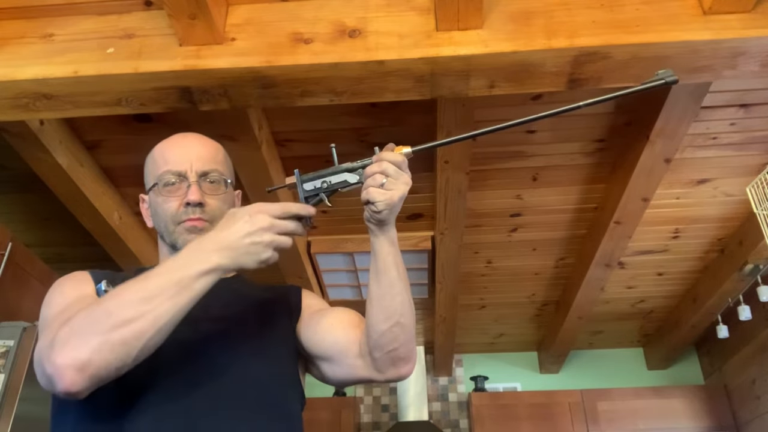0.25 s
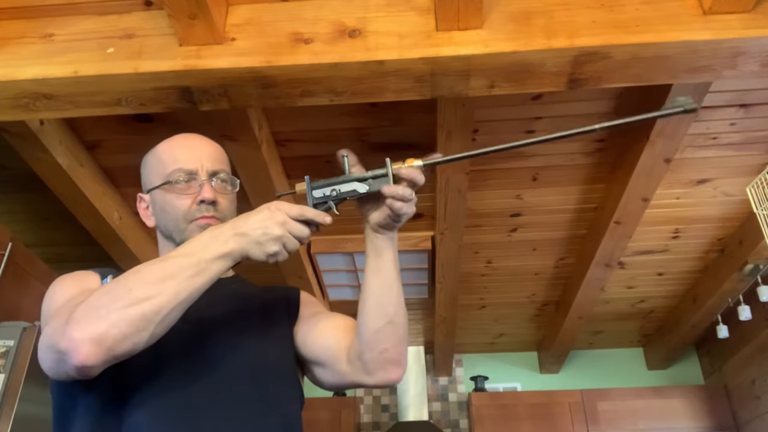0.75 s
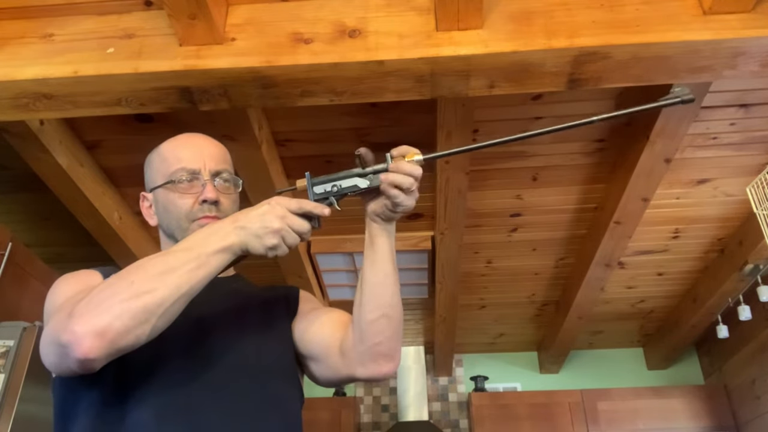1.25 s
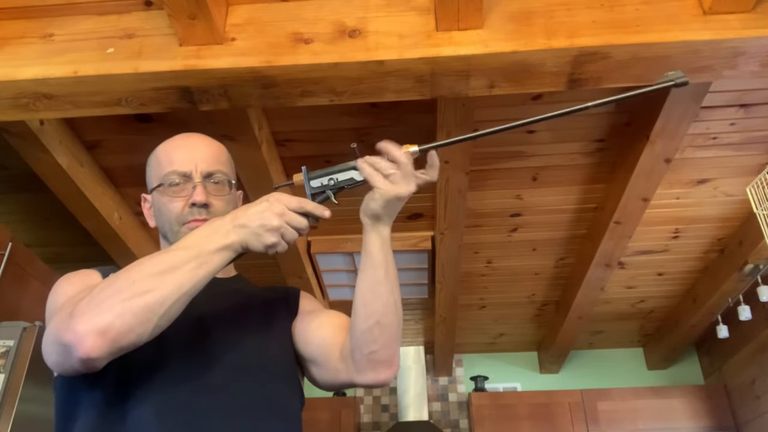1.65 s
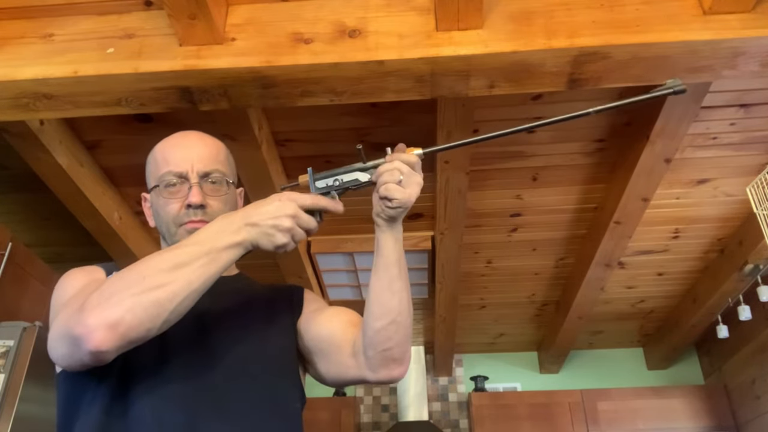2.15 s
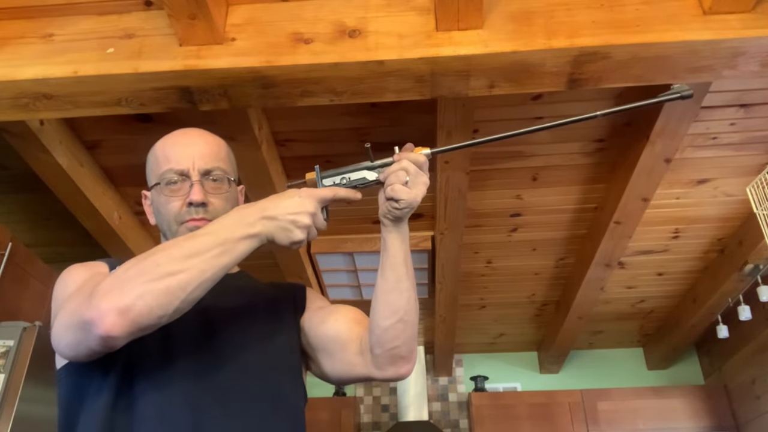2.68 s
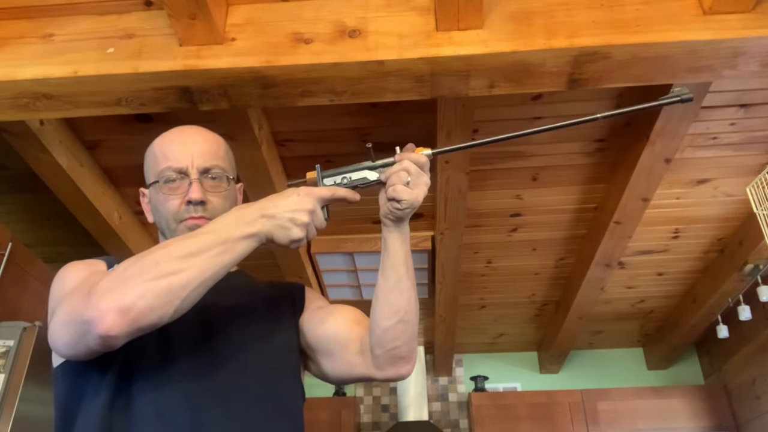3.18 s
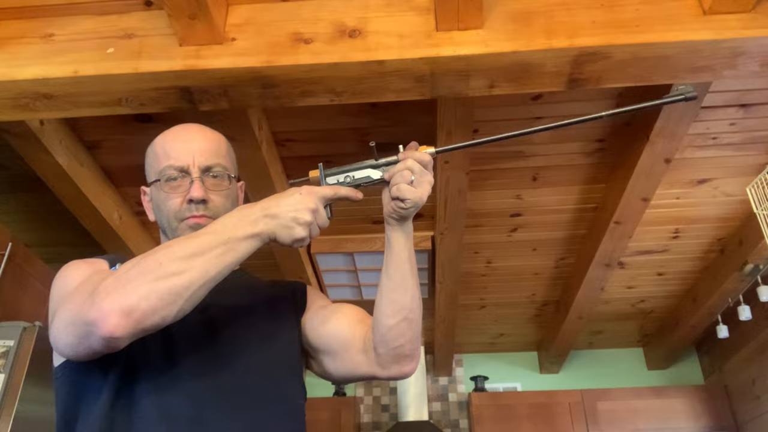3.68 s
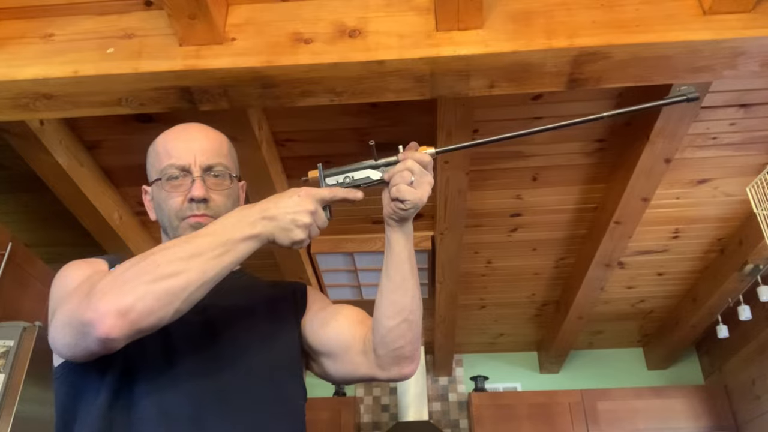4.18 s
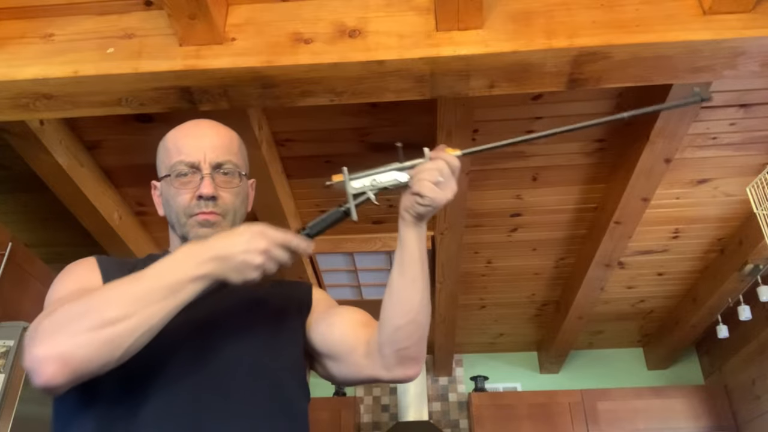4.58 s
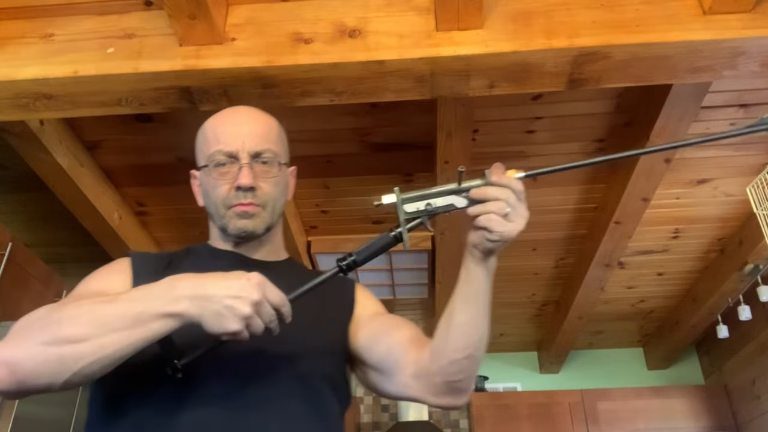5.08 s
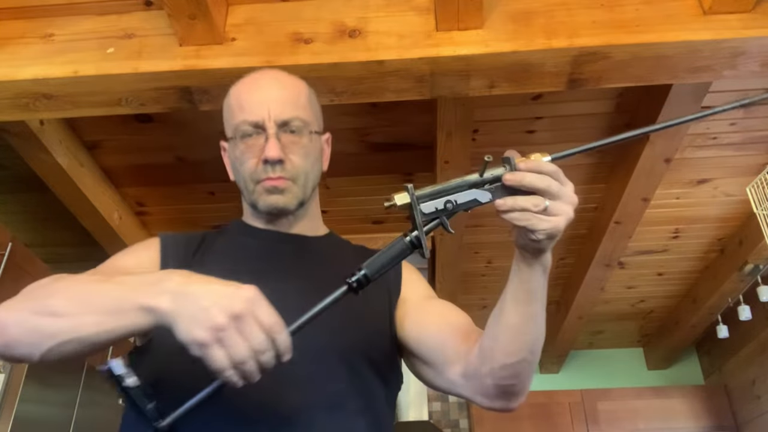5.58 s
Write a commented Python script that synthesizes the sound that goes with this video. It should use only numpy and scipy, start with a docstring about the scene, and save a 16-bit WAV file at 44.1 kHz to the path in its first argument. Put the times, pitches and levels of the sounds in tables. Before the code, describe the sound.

A rifle is handled indoors over a very faint low appliance hum. Faint steel ticks and scrapes lead to a firm bright double clack around one second, with a high ping. Small slides follow, then a quiet pause of about two seconds. Near four seconds the striker falls on an empty chamber, a loud crisp snap with a short spring ring and room tail. Faint ticks and a soft rustle close it.

```python
"""A timber-roofed kitchen with an appliance humming in the background; a rifle is worked by hand.
Steel parts click and slide as noise bursts that stir faint ringing modes; the catch gives a high ping.
After a pause the striker falls on an empty chamber: a sharp, dispersed snap, then its spring chatters and rings.
Then the metal stock ticks as the rifle is lowered, and arms or clothes rustle faintly, a long soft noise burst.
A diffuse noise tail gives the sense of distance and walls."""
import sys
import numpy as np
from scipy import signal
from scipy.fft import rfft, irfft
from scipy.io import wavfile
from scipy.ndimage import uniform_filter1d

SR = 44100
rng = np.random.default_rng(int(sys.argv[2]) if len(sys.argv) > 2 else 0)


def bounce(signal):
    """Save signal as a 16-bit WAV file at the path given by the first command-line argument."""
    frames = np.transpose(np.atleast_2d(signal))
    limited = np.clip(frames, -1, 1)
    pcm = np.round(limited * 32767).astype(np.int16)
    wavfile.write(sys.argv[1], SR, pcm)


N = 257544
TIME = np.arange(N) / SR  # s

# striker falls and rebounds: t/s, level/dB
STRIKER_BLOWS = [(3.9660, -9.5), (3.9733, -23.5)]
# steel parts meet as hands settle, the action closes and locks, loose parts shift:
# t/s, relative level/dB, brightness/(dB per octave)
STEEL_CLICKS = [(0.2955, -53, 3), (0.553, -59.5, 5), (0.7432, -65, -13), (0.9095, -34, 0.5),
                (0.9885, -41, -3), (0.9948, -37.5, -4), (1.0235, -34, 9), (1.0293, -37.5, 2.5),
                (1.1785, -53.5, -12.5), (1.539, -51, 0), (4.149, -44.5, -7), (5.084, -60.5, 3),
                (5.323, -57, 5)]
# steel slides on steel; the last, long and faint row is a rustle of arms or clothes:
# t/s, relative level/dB, brightness/(dB per octave), fall time/s
SLIDES_AND_RUSTLE = [(0.105, -61, 6, 0.015), (0.303, -48, 8, 0.0097), (0.402, -64, 4, .011),
                     (0.853, -66.5, -1.5, 0.088), (1.314, -56, -1, 0.0099), (1.662, -59.5, 1, 0.016),
                     (1.678, -54, -3, .007), (1.765, -58, 8, 0.012), (4.329, -61, 2.5, 0.035),
                     (4.435, -62, 3, 0.015), (5.331, -56, -3, 0.014), (5.65, -71.5, 1, 0.16)]
# catch, bolt knob and trigger parts ping: t/s, f/Hz, relative level/dB, t60/s
PART_PINGS = [(1.029, 13800, -24.5, 0.037), (1.175, 8800, -51, 0.057), (2.608, 5820, -64, 0.064),
              (3.957, 6750, -37, 0.054)]
# stock is nudged: t/s, relative level/dB
STOCK_NUDGES = [(4.381, -64), (5.191, -65), (5.3236, -51)]

# ringing modes of the receiver, the mainspring and the stock: f/Hz, relative level/dB, t60/s
RECEIVER_MODES = [(1860, -15, .05), (2880, -12.5, 0.05), (3330, -4.5, 0.079), (5030, -7, 0.067),
                  (6156, 6.5, 0.0397), (6484, -4, 0.072), (7290, -13, 0.17), (9570, 7.5, 0.041),
                  (10150, -11, .07)]
SPRING_MODES = [(2430, -22, 0.15), (2750, 3, .22), (2600, -8, .24), (2875, -14, .52), (2811, 0.5, 0.22),
                (2930, -8.5, 0.17), (2980, -1.5, .2), (6600, 2, 0.31), (10220, 7.5, 0.18),
                (10210, -4, 0.19)]
STOCK_MODES = [(1183, -4, 0.023), (1500, -2, 0.017), (1600, 0.5, 0.013), (2030, 3, 0.01), (3740, 1, 0.016),
               (5990, -3, 0.039), (10900, -10, 0.16)]

# spectra of the striker's blow, the spring's chatter, a click, a slide or rustle and the room air:
# f/Hz, relative density/(dB per Hz)
SNAP_SPECTRUM = [(200, -41), (700, -23.5), (2800, -28), (4200, -12), (7500, -11), (9300, -12.5),
                 (11600, -9), (12600, 0), (14600, 0.5), (16000, -10.5)]
CHATTER_SPECTRUM = [(200, -22), (400, -15), (700, -24.5), (1700, -17.5), (2100, -7), (2700, 5.5),
                    (3200, -8), (6500, -3), (10000, -1.5), (12000, -2.5), (15500, -0.5)]
CLICK_SPECTRUM = [(300, -23), (900, -14.5), (1600, -13), (1900, -5.5), (2600, -2.5), (3200, 0), (6000, 2),
                  (10000, 2), (16000, 4)]
SLIDE_SPECTRUM = [(500, -27), (2000, -6), (2800, -2.5), (3300, 4), (4000, 1), (5000, -3), (7000, 0),
                  (16000, -3.5)]
AIR_SPECTRUM = [(30, -23), (45, -13), (70, -1), (85, -3), (105, 1), (150, 0.5), (250, 1), (400, -2.5),
                (1000, -15), (1600, -17.5), (2100, -22.5), (3000, -23), (4500, -27.5), (15500, -28.5)]

# reverberation of the kitchen: f/Hz, t60/s
KITCHEN_DECAY = [(300, .40), (1500, .48), (3000, .46), (6500, .39), (9500, .35), (13500, .26)]
# swing of the motor's hum: t/s, relative level/dB
MOTOR_SWING = [(0.1, -65), (1.31, -72.5), (2.0, -81), (3.02, -80), (3.18, -73.5), (4.64, -67.5), (5.8, -67)]

SEAR_LEAD_S, SEAR_STEP_S = 0.0044, 0.0072  # last jerk before the blow; time between jerks
SEAR_DB, SEAR_GROWTH_DB = -25.5, 13  # relative level of the last jerk; growth per jerk
SEAR_BRIGHTNESS_DB = 3.5  # per octave
CLICK_FALL_S = 0.0028
TILT_LOW_HZ, TILT_HIGH_HZ = 3150, 13000  # range over which the place of contact tilts the spectrum
HANDLING_ROOM_DB = -1  # small noises reach the room a little less than the snap
MAINS_HZ, MOTOR_HZ, DRONE_HZ = 60, 59.25, 127.3
MOTOR_DB = 0.5  # offset of the fundamental from its swing
OCTAVE_DB, OCTAVE_FOLLOWS = -63.5, 0.39  # mean level of the octave; share of the swing it follows
MAINS_DB, DRONE_DB, AIR_DB = -71.5, -78, -60
LOW_CUT_HZ, CUTOFF_HZ = 42, 16000  # edges of what the microphone recording keeps


def striker(spread=0.0028, chatter_db=-21.0, chatter_delay=0.011, spring_db=-38):
    """The striker slams home and rebounds; the released spring chatters in its tube and rings on."""
    out = np.zeros(N)
    fired = STRIKER_BLOWS[0][0]
    for s, db in STRIKER_BLOWS:
        add(out, s, from_db(db) * crack(SNAP_SPECTRUM, spread))
    chatter = burst(noise(CHATTER_SPECTRUM), rise=0.0018, fall=0.02)
    add(out, fired + chatter_delay, from_db(chatter_db) * chatter)
    return out + ring([(fired, spring_db)], SPRING_MODES)


def crack(spectrum, spread, size=2048, count=24):
    """One impact dispersed by the steel, each pitch delayed on its own; energy of level 1 over the spread."""
    hz = np.arange(size // 2 + 1) * SR / size
    knots = np.linspace(0, SR / 2, count)
    delay = np.interp(hz, knots, spread * rng.uniform(0.2, 1, count))
    # the running sum of the delay over frequency gives the phase
    phase = -2 * np.pi * np.cumsum(delay) * SR / size
    sound = irfft(from_db(at_hz(spectrum, hz)) * np.exp(1j * phase), size)
    return sound * np.sqrt(spread * SR / np.sum(sound ** 2))


def sear(count=3):
    """The sear slips off the striker in jerks, each stronger than the one before; rows as for clicks."""
    last = STRIKER_BLOWS[0][0] - SEAR_LEAD_S
    return [(last - k * SEAR_STEP_S, SEAR_DB - k * SEAR_GROWTH_DB, SEAR_BRIGHTNESS_DB)
            for k in range(count)]


def clicks(click_db=2.0, grain_db=3.0, ring_db=-18):
    """Hard contacts, the sear's among them: each a crack of a few milliseconds."""
    rows = [(*click, CLICK_FALL_S) for click in list(STEEL_CLICKS) + sear()]
    sound = contacts(rows, CLICK_SPECTRUM, rise=0.0003, grain_db=grain_db, ring_db=ring_db)
    return from_db(click_db) * sound


def slides_and_rustle():
    """Sliding parts swell more slowly than clicks, with a grainy rasp; the closing rustle is made alike."""
    return contacts(SLIDES_AND_RUSTLE, SLIDE_SPECTRUM, rise=0.0018, grain_db=2.5, ring_db=-20.0)


def contacts(rows, spectrum, rise, grain_db, ring_db):
    """Contacts give grainy noise, as of crowded, hand-damped modes; the receiver's modes ring on faintly."""
    out, blows = np.zeros(N), []
    for s, level_db, brightness_db, fall in rows:
        # the place of contact sets the balance of low and high modes
        tilt_db = brightness_db * np.log2(TILT_HIGH_HZ / TILT_LOW_HZ)
        source = noise(spectrum, [(TILT_LOW_HZ, 0), (TILT_HIGH_HZ, tilt_db)])
        # the faces catch and slip about once a millisecond
        catching = uniform_filter1d(rng.standard_normal(len(source)), size=44)
        grains = from_db(grain_db * rms_one(catching))
        add(out, s, from_db(level_db) * burst(source * grains, rise, fall))
        blows.append((s, level_db + ring_db))
    return out + ring(blows, RECEIVER_MODES)


def pings():
    """A small loose part, flicked by itself, rings with a single decaying mode."""
    return sum(ring([(s, db)], [(hz, 0, t60)]) for s, hz, db, t60 in PART_PINGS)


def stock():
    """The metal stock, nudged, ticks with its short-lived modes."""
    return ring(STOCK_NUDGES, STOCK_MODES)


def kitchen(x, wet_db=-4, first_echo=0.0031, build_up=0.0015, treble_loss_db=3, treble_hz=13000):
    """Echoes from beams and walls thicken into a noise tail whose treble is weaker and dies first."""
    t = TIME[:SR * 3 // 4]
    hz = np.arange(len(t) // 2 + 1) * SR / len(t)
    treble_loss = from_db(-treble_loss_db * (hz / treble_hz) ** 2)
    echoes = rfft(rng.standard_normal(len(t))) * treble_loss
    tail = 0
    edges = np.linspace(100, CUTOFF_HZ, 33)
    for low, high in zip(edges, edges[1:]):
        band = irfft(echoes * (hz >= low) * (hz < high), len(t))
        t60 = at_hz(KITCHEN_DECAY, np.sqrt(low * high))
        tail = tail + band * np.exp(-np.log(1000) * t / t60)
    tail = tail * (1 - np.exp(-np.maximum(t - first_echo, 0) / build_up))
    tail = tail / np.sqrt(np.sum(tail ** 2))
    return from_db(wet_db) * signal.fftconvolve(x, tail)[:N]


def appliance(waver=0.28):
    """A motor turns just under the mains rate; its octave beats with the mains buzz, over a soft rush of air."""
    swing_db = np.interp(TIME, *np.transpose(MOTOR_SWING))
    octave_db = OCTAVE_DB + OCTAVE_FOLLOWS * (swing_db - swing_db.mean())
    # slow noise lets the octave's phase wander by the waver, in radians rms
    wander = noise([(1, 0), (4, -6), (20, -50), (100, -120)], size=N)
    motor = tone(MOTOR_HZ, swing_db + MOTOR_DB)
    octave = tone(2 * MOTOR_HZ, octave_db, waver * wander)
    buzz = tone(2 * MAINS_HZ, MAINS_DB)
    drone = tone(DRONE_HZ, DRONE_DB)
    air = from_db(AIR_DB) * noise(AIR_SPECTRUM, size=N)
    return motor + octave + buzz + drone + air


def ring(blows, modes):
    """Every blow (t/s, level/dB) sets decaying sine modes ringing, each with a strength of its own."""
    out, t = np.zeros(N), TIME[:SR // 2]
    hz, level_db, t60 = np.transpose(modes)
    decay = np.exp(-np.log(1000) * t / t60[:, None])
    waves = np.sin(2 * np.pi * np.outer(hz, t)) * decay
    for s, db in blows:
        strength_db = rng.normal(0, 2, len(hz))
        add(out, s, from_db(db + level_db + strength_db) @ waves)
    return out


def burst(source, rise, fall):
    """A source swells and dies away; its energy is that of level 1 held for the fall time."""
    t = TIME[:len(source)]
    sound = source * (1 - np.exp(-t / rise)) * np.exp(-t / fall)
    return sound * np.sqrt(fall * SR / np.sum(sound ** 2))


def noise(*spectra, size=16384):
    """Noise coloured by the sum of some dB spectra; rms 1."""
    hz = np.arange(size // 2 + 1) * SR / size
    colour_db = sum(at_hz(spectrum, hz) for spectrum in spectra)
    white = rfft(rng.standard_normal(size))
    return rms_one(irfft(white * from_db(colour_db), size))


def tone(hz, db, phase=0):
    """A sine of the given rms level."""
    return np.sqrt(2) * from_db(db) * np.sin(2 * np.pi * hz * TIME + phase)


def from_db(db):
    """Decibels to gain."""
    return 10 ** (np.asarray(db) / 20)


def rms_one(x):
    """Scale to an rms of 1."""
    return x / np.sqrt(np.mean(x ** 2) + 1e-20)


def at_hz(points, hz):
    """Read a table on a log-frequency axis."""
    knots, values = np.transpose(points)
    return np.interp(np.log(np.maximum(hz, 1)), np.log(knots), values)


def add(out, s, sound):
    """Mix a sound in from time s on."""
    start = round(s * SR)
    out[start:start + len(sound)] += sound[:N - start]


def scene():
    """The rifle and the rustle heard directly, their echo in the kitchen and the appliance behind."""
    snap = striker()
    handling = clicks() + slides_and_rustle() + pings() + stock()
    echo = kitchen(snap + from_db(HANDLING_ROOM_DB) * handling)
    return (handling + snap + echo + appliance())[None]


def record(dry):
    """The microphone loses the deepest bass, loud peaks are rounded and the top is cut steeply."""
    low_cut = signal.butter(2, LOW_CUT_HZ, "high", fs=SR, output="sos")
    picked_up = signal.sosfilt(low_cut, dry)
    rounded = 0.8 * np.tanh(picked_up / 0.8)
    top_cut = signal.ellip(12, 0.1, 80, CUTOFF_HZ, fs=SR, output="sos")
    return signal.sosfilt(top_cut, rounded)


dry = scene()
out = record(dry)
bounce(out)
```